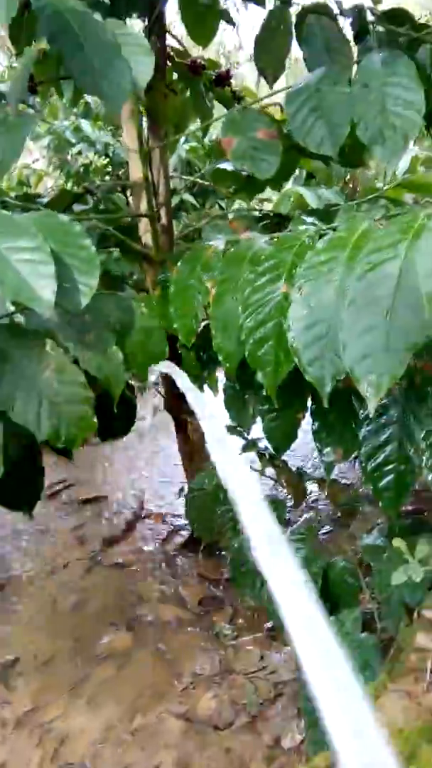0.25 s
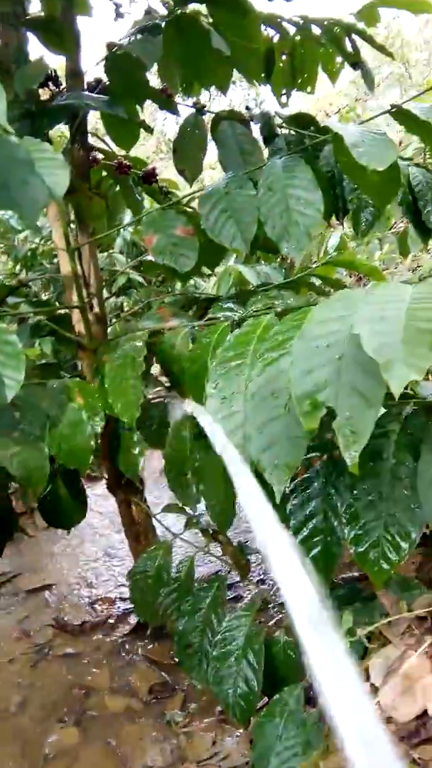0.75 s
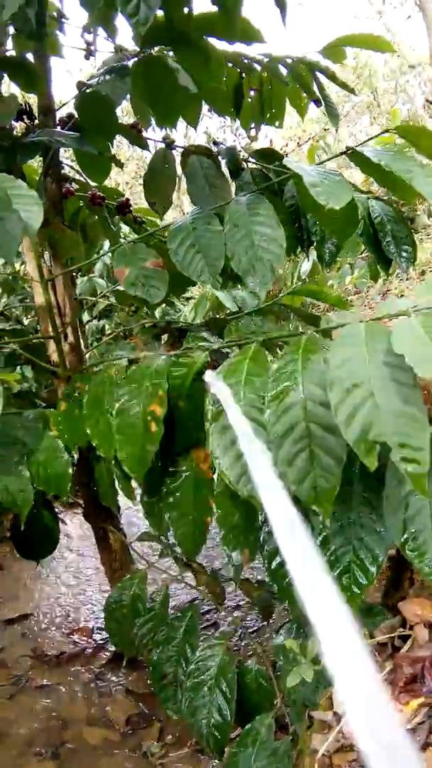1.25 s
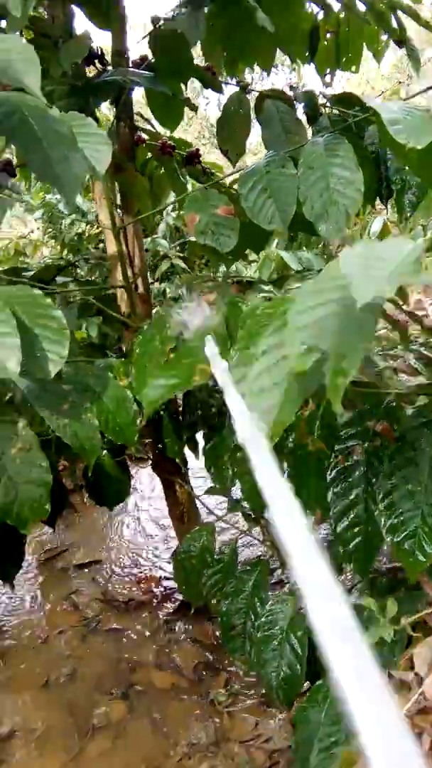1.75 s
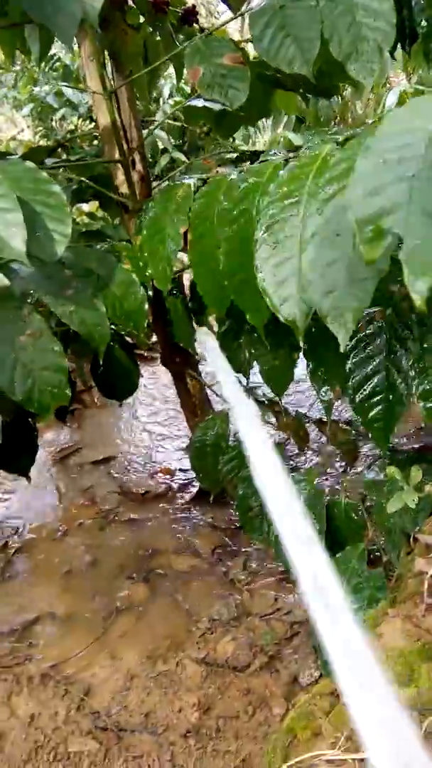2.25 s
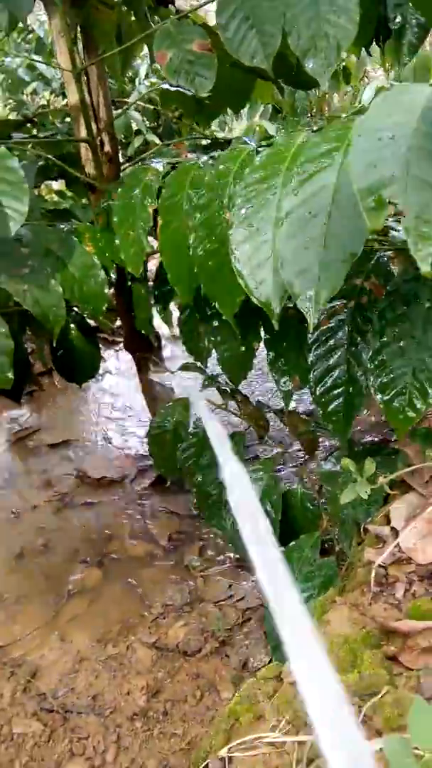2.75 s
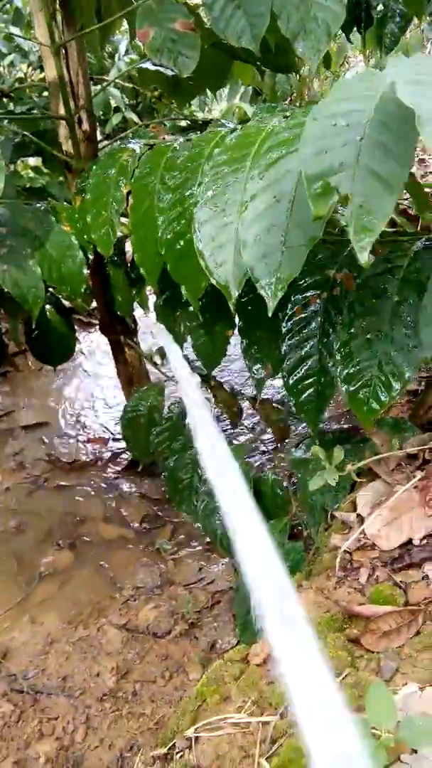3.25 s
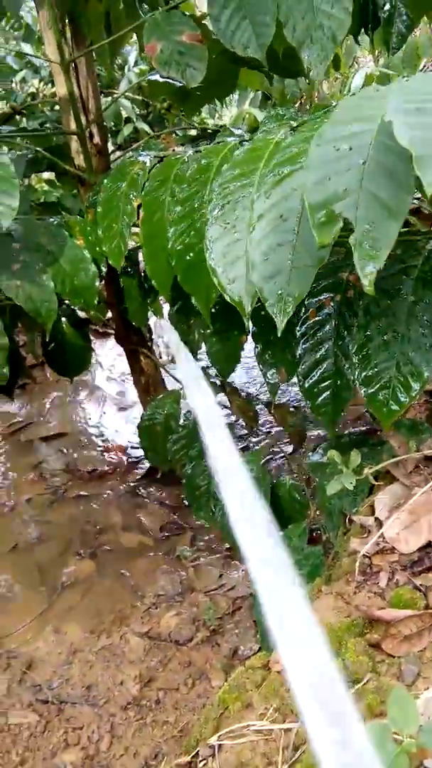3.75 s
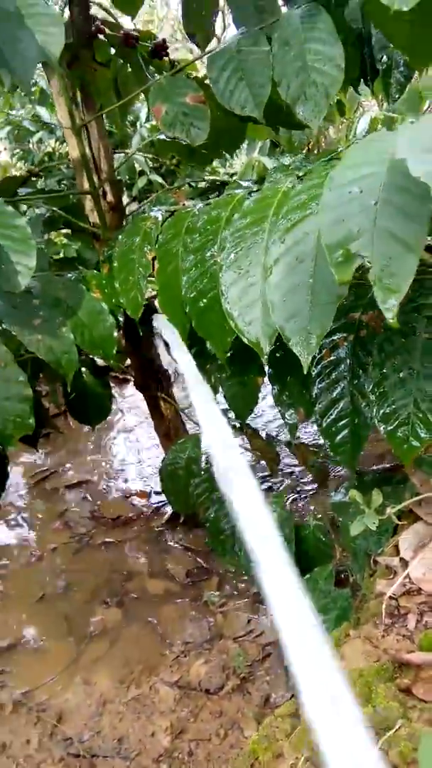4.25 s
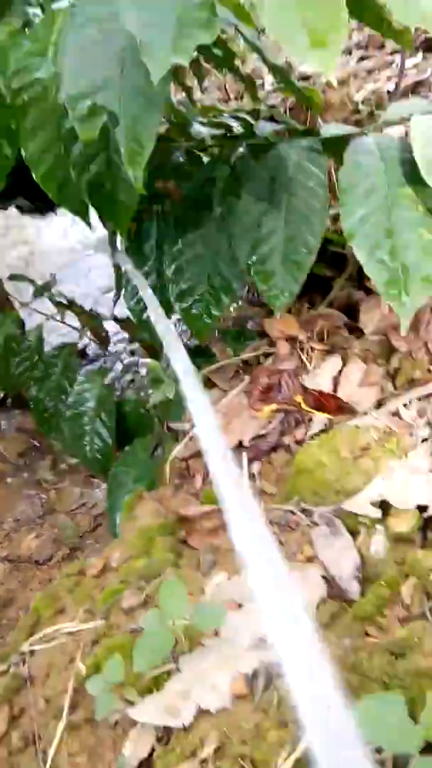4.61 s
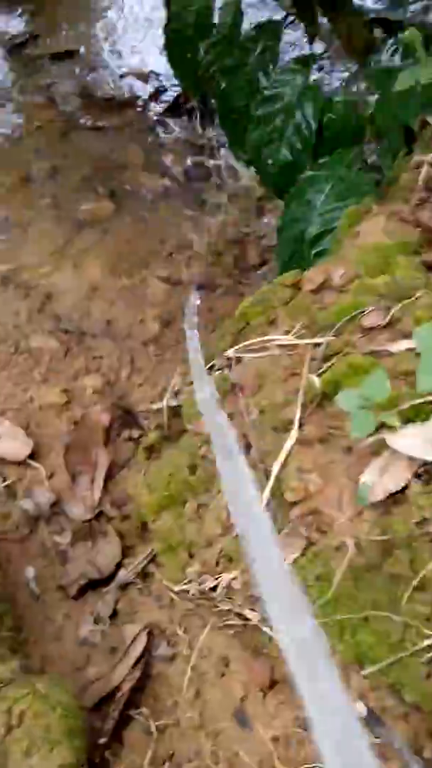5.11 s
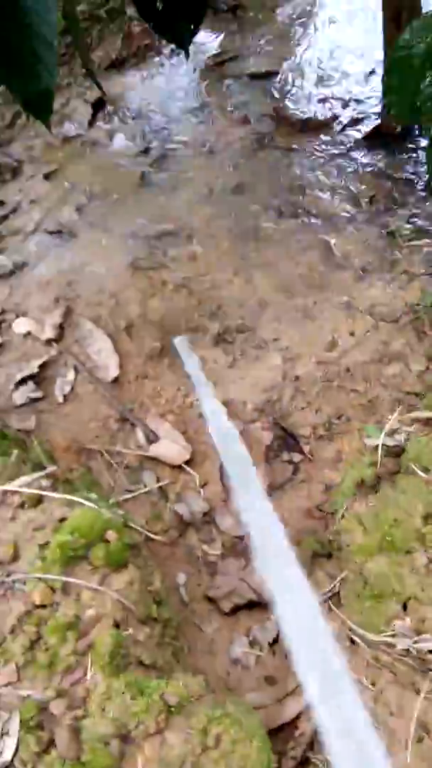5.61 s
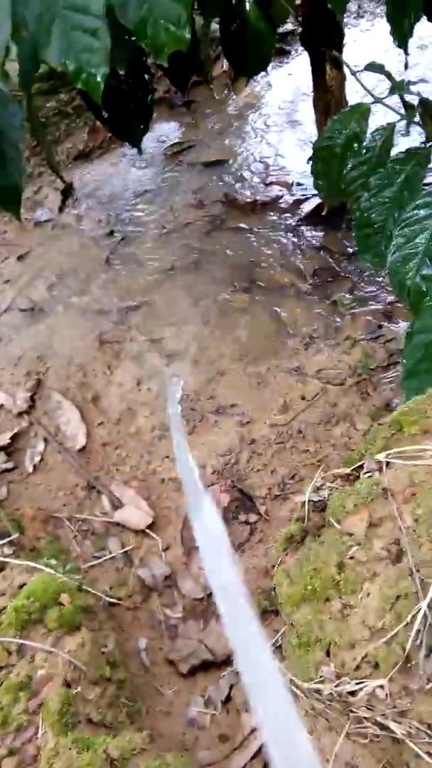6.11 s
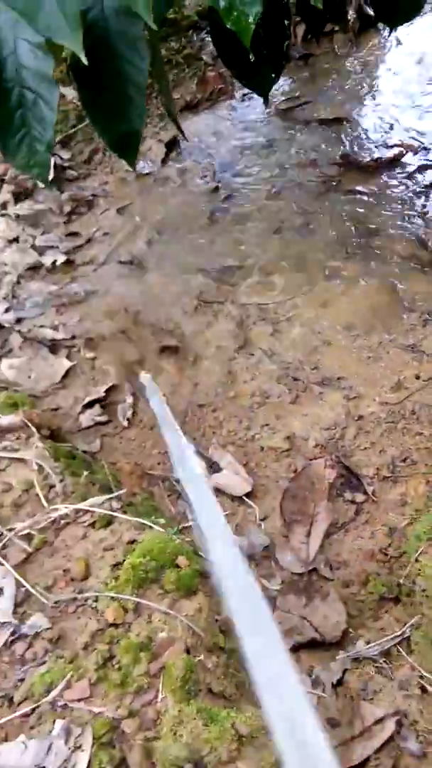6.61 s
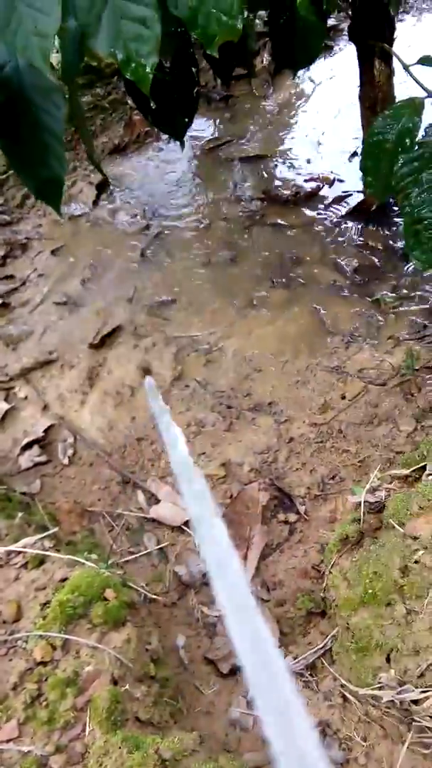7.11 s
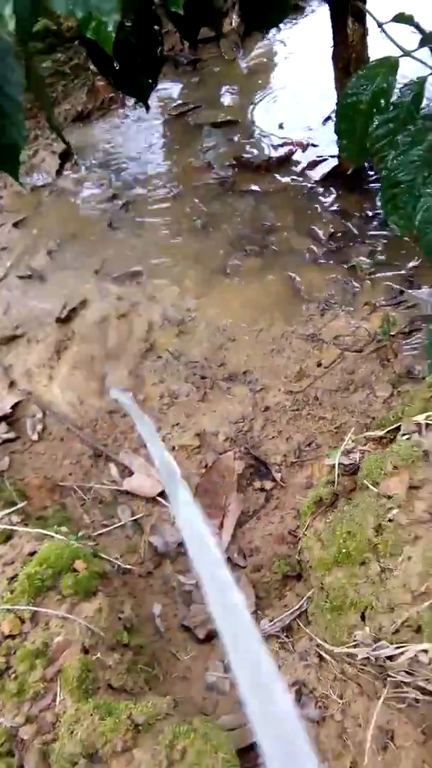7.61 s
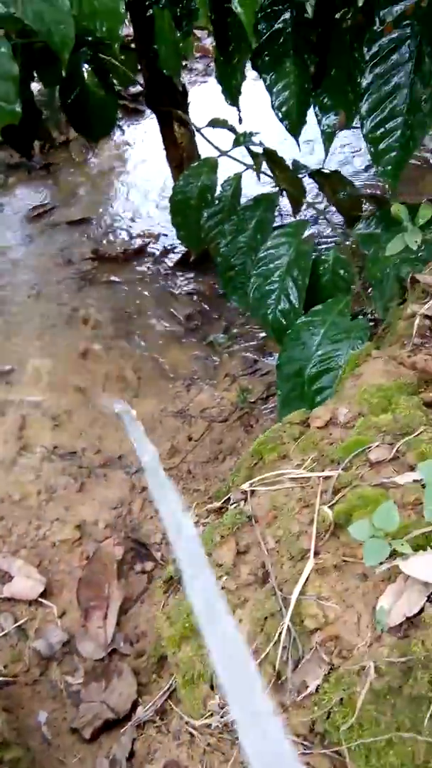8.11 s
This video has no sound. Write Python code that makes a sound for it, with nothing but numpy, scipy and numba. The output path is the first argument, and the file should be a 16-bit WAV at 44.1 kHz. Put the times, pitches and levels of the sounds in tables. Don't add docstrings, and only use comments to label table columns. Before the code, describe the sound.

Water hisses steadily from a hose, slapping foliage over a puddle, then sparkling on bare mud close by, with uneven splatters and soft bubble plops.

```python
import sys
import numpy as np
from scipy import signal
from scipy.fft import rfft, irfft, next_fast_len
from scipy.io import wavfile
from scipy.ndimage import uniform_filter1d, map_coordinates
from numba import njit

SR = 44100
rng = np.random.default_rng(int(sys.argv[2]) if len(sys.argv) > 2 else 0)


def ratio_of_db(decibels):
    return 10 ** (np.asarray(decibels, float) / 20)


def dump_mix(stems):
    frames = np.atleast_2d(stems).T
    limited = np.clip(frames, -1, 1)
    pcm = np.round(limited * 32767).astype(np.int16)
    wavfile.write(sys.argv[1], SR, pcm)


N = 368676

# (time [s], flow [dB], fineness [dB])
JET_FLOW = [(0.0, -41, -4), (0.56, -42, 2), (1.11, -44, -3.5), (1.48, -36, -3), (1.77, -37, -6),
            (1.9, -39.5, -2), (2.23, -48, 4), (2.79, -44, 6.5), (3.34, -44, -1), (3.9, -43.5, -3.5),
            (4.46, -41.5, 1), (5.02, -45, 1), (5.57, -37.5, 7), (6.13, -45, 9.5), (6.69, -39, 4),
            (7.25, -38.5, 5), (7.8, -36.5, 0.5), (8.36, -42, 9.5)]
# (time [s], change [dB], half length [s], change of fineness [dB])
JET_GUSHES = [(0.038, -7.5, 0.018, 1.5), (0.066, 4, 0.0058, -6), (0.137, -4.5, 0.02, 0),
              (0.225, 1, 0.052, 2.5), (0.29, -2.5, 0.011, 5), (0.603, 0, 0.025, 0.5), (0.68, -2, 0.05, -6),
              (1.215, -5, 0.017, 3), (1.316, -7.5, 0.069, 0.8), (1.845, -5.5, 0.019, 2),
              (1.966, -8.5, 0.046, -1.8), (2.137, 10.5, 0.014, 0.5), (2.33, 8, 0.048, 1.5),
              (2.48, 5.5, 0.084, -6.5), (2.778, 9, 0.016, -10.5), (2.931, 8.5, 0.024, -3),
              (3.074, -9, 0.0078, 8), (3.202, 7, 0.014, 1), (3.272, 5, 0.0086, -12), (3.267, -8, 0.0036, 2),
              (3.3, -11, 0.01, -1), (3.471, 5.5, 0.016, 0), (4.507, 4, 0.023, -2), (4.836, -16, 0.011, 13),
              (4.945, 6, 0.06, 0), (5.18, 5.5, 0.063, -3), (5.552, -5, 0.063, 0), (5.849, -8, 0.0075, 3),
              (5.88, -6.5, 0.0092, 5), (5.972, 11.5, 0.058, -15.5), (6.066, 3, 0.054, -5),
              (6.16, 3.5, 0.042, -8), (6.382, 3.5, 0.064, -1.5), (6.583, 6, 0.017, -4.5),
              (6.96, 4, 0.032, -7), (7.02, -3, 0.0089, -4), (7.12, 2.5, 0.015, -5), (7.3, 1.5, 0.03, -1),
              (7.577, 1.5, 0.036, -1), (7.675, 4, 0.018, -3.5), (7.8, -6.5, 0.043, 9.5),
              (7.904, -10, 0.04, 11), (7.968, -7.5, 0.015, 6)]
# (time [s], level [dB])
MISTING = [(0, -17.5), (0.35, -21.5), (0.7, -15), (1.3, -18.5), (1.7, -17), (2.4, -23), (2.85, -15),
           (3.15, -22.5), (3.7, -18), (4.2, -22), (4.6, -18), (5.5, -18.5), (6.2, -19), (6.75, -18.5),
           (7.2, -19), (7.6, -21.5), (8.36, -19)]
# (time [s], rise [dB])
NOZZLE_SPITS = [
    (0.32, 10),
    (1.19, 5),
    (1.67, 2),
    (2.27, 6),
    (3.36, 5),
    (4.15, 7),
    (6.47, 2),
    (8.29, -1),
]
# (time [s], level [dB])
SPRAY_CLOSENESS = [(0, -5), (1.3, -6), (2.5, -3), (3.3, -4), (4.5, -4.5), (5.5, -0.5), (6, 1), (6.4, 0),
                   (6.8, 0), (7.1, -4), (7.35, -3.5), (7.6, -3), (7.85, 5.5), (8.36, -3.5)]
# (time [s], change [dB], half length [s])
COARSE_MIST_DIP = (7.27, -5, 0.19)
# (time [s], gain [dB], half length [s], pitch [Hz])
HOLLOW_POCKETS = [
    (1.09, -1, 0.05, 2500),
    (1.6, -2, 0.17, 2470),
    (6.98, 4, 0.035, 2750),
    (7.69, -5, 0.025, 2910),
]
# (time [s], peak [dB], ring [Hz])
LEAF_SLAPS = [(0.1027, -25, 2920), (0.181, -25.5, 4200), (0.1947, -21, 4330), (0.2141, -22.5, 2500),
              (0.32, -21, 3650), (0.41, -18, 4130), (0.5164, -21, 4720), (0.5511, -20.5, 4090),
              (0.854, -22.5, 3860), (1.049, -29, 2500), (1.0793, -25, 2450), (1.0979, -25, 2640),
              (1.184, -20, 3130), (1.3997, -25, 2520), (1.4195, -23, 3100), (1.437, -24, 2620),
              (1.4541, -29, 2530), (1.48, -25, 2520), (1.6213, -21, 2530), (1.6763, -27, 2500),
              (1.7384, -18.5, 2880), (1.778, -20, 2650), (1.9094, -23, 2920), (2.137, -23, 4470),
              (2.1928, -24.5, 4140), (2.2366, -28, 4160), (2.2593, -29, 4170), (2.3124, -14, 4200),
              (2.347, -21, 4970), (2.362, -17.5, 2970), (2.4197, -24, 4340), (2.4784, -24, 2800),
              (2.5428, -21.5, 3600), (2.598, -23, 4200), (2.6957, -19.5, 3230), (2.7746, -15, 3030),
              (2.829, -26, 4040), (2.922, -17, 2880), (3.0044, -21, 5300), (3.088, -22.5, 4460),
              (3.093, -21, 2860), (3.155, -27, 4400), (3.1852, -13, 4250), (3.2495, -24, 2730),
              (3.2707, -23.5, 2470), (3.3262, -26, 3000), (3.346, -18, 4500), (3.438, -21.5, 4400),
              (3.816, -29, 2980), (4.33, -20.5, 2830), (4.3849, -20, 2430), (4.4283, -23.5, 3020),
              (4.44, -26, 3000), (4.488, -21, 2980), (4.5185, -20.5, 2980), (4.5305, -23, 3600),
              (4.6808, -23, 3570), (4.734, -26, 2860), (4.749, -23, 2800), (4.9377, -18, 4540)]
# (time [s], peak [dB], ring [Hz])
SOIL_SLAPS = [(5.369, -18.5, 5000), (5.3944, -20, 3860), (5.475, -23, 3370), (5.5366, -26, 5300),
              (5.6883, -16, 3640), (5.7347, -17, 5200), (5.7744, -15.5, 5300), (5.8115, -30, 5140),
              (5.824, -26, 5300), (5.89, -18, 4170), (5.9004, -18.5, 2640), (5.919, -16, 2990),
              (5.9305, -12, 6340), (5.9452, -16, 4400), (5.9498, -26, 2960), (5.964, -20, 2950),
              (5.9827, -9.5, 2900), (6.0023, -18, 2700), (6.045, -19, 3000), (6.097, -19, 4740),
              (6.3213, -23, 4730), (6.3438, -14.5, 4500), (6.377, -19.5, 4160), (6.449, -24, 4910),
              (6.5064, -27, 4970), (6.5606, -16, 5140), (6.606, -18, 4370), (6.6338, -17, 5170),
              (6.66, -19, 3750), (6.7179, -19, 4200), (6.735, -15, 2720), (6.7717, -15.5, 4980),
              (6.7987, -27, 4300), (6.8204, -14.5, 5100), (6.839, -16, 4380), (6.9376, -19, 2980),
              (7.043, -19, 4480), (7.0926, -15, 5010), (7.163, -19, 4370), (7.184, -20, 4470),
              (7.2173, -22, 4780), (7.289, -18, 4370), (7.336, -20, 4560), (7.3715, -19, 4700),
              (7.4094, -16, 4170), (7.5944, -21, 4800), (7.6333, -20, 4700), (7.67, -22, 3240),
              (7.7214, -18, 4730), (7.794, -27, 4940), (7.864, -25, 5400), (7.9758, -17.5, 4480),
              (8.009, -13.5, 5000), (8.054, -23, 5530), (8.0813, -20, 4760), (8.1215, -19, 4340),
              (8.1654, -22, 2800), (8.2854, -18, 4500), (8.327, -19, 5430), (8.3435, -13.5, 4850)]
# (time [s], peak [dB])
NEAR_DROPS = [(0.3127, -35), (1.6596, -27), (1.8721, -38), (2.3236, -40), (2.7382, -39), (2.7736, -35),
              (2.8285, -38), (2.8709, -43), (2.8858, -36), (4.9392, -41), (5.2131, -40), (5.4745, -34),
              (5.5278, -32), (5.5653, -33), (5.672, -35), (5.7074, -42), (5.7803, -34), (5.8995, -33),
              (5.9688, -41), (6.097, -39), (6.1858, -26.5), (6.2537, -36), (6.2781, -32), (6.3345, -30),
              (6.4482, -32), (6.7017, -37), (6.7451, -26), (6.8029, -32), (6.9745, -30), (7.2374, -40),
              (7.4629, -35), (7.6331, -31), (7.658, -34), (7.7209, -31), (7.8965, -39), (7.9758, -36),
              (8.1843, -36), (8.2018, -30), (8.2856, -34)]
# (time [s], churning [dB], shallowness [dB])
PUDDLE_CHURN = [(0.0, -53, 6.5), (0.56, -55.5, 6), (1.11, -48.5, 8), (1.67, -48.5, 9), (2.23, -61, 8.5),
                (2.79, -53, 6.5), (3.34, -54, 3.5), (3.9, -55, 7), (4.46, -55.5, 6), (5.02, -57, 4.5),
                (5.57, -60, 2.5), (6.13, -56.5, 7), (6.69, -67.5, 8.5), (7, -58, 5.5), (7.25, -55.5, 6),
                (7.5, -57.5, 2), (7.8, -63.5, 6), (8.36, -53, 1)]
# (time [s], change [dB], half length [s], change of shallowness [dB])
PUDDLE_GURGLES = [(0.344, -5.5, 0.05, 0), (0.865, 6, 0.023, 2), (1.272, -5.5, 0.098, -0.5),
                  (1.807, 3.5, 0.04, 4.5), (2.11, 9, 0.062, 2.5), (2.554, 7.5, 0.014, -4),
                  (2.852, -6.0, 0.055, 3), (2.92, -3, 0.027, 2), (3.059, -12, 0.053, -7),
                  (3.117, 5.5, 0.058, 8.5), (3.297, -10, 0.016, -3), (3.43, 3.5, 0.018, 7),
                  (3.335, 3, 0.012, 3), (3.622, 3.5, 0.061, -4.5), (3.757, 2.5, 0.017, -8),
                  (4.044, 5.5, 0.018, 1), (4.125, 4, 0.0084, -12), (4.17, 2.5, 0.049, 3),
                  (4.52, 1.5, 0.024, 3), (4.625, 4.5, 0.11, 5.5), (5.006, 7.5, 0.025, -4.5),
                  (5.135, -1, 0.04, -4), (5.192, 8.5, 0.018, 8), (5.273, -2, 0.029, 2),
                  (5.41, 0, 0.036, -8.5), (5.853, 1, 0.07, -10.5), (5.994, 5, 0.072, 2.5),
                  (6.292, -1.5, 0.057, -8.5), (6.587, 12, 0.035, -1), (6.746, 9.5, 0.09, -6),
                  (7.117, 7, 0.058, -1), (7.3, -1, 0.025, -5), (7.382, 1, 0.03, 4), (7.412, 8.5, 0.075, -3),
                  (7.623, 5, 0.039, 8), (7.907, 4.5, 0.06, -7.5), (8.273, -8, 0.024, -2)]
# (time [s], peak [dB], pitch [Hz])
BIG_BUBBLES = [(0.602, -29, 1340), (0.872, -23, 1240), (0.617, -30, 970), (1.185, -21, 2300),
               (1.3, -34, 800), (1.602, -30, 1530), (1.766, -21.5, 1570), (1.818, -24.5, 1080),
               (2.05, -27, 1520), (2.145, -33.5, 537), (2.513, -28.5, 480), (2.55, -31, 510),
               (2.557, -30, 1300), (2.774, -18, 1370), (2.776, -13, 2120), (2.791, -22, 2900),
               (3.104, -29, 1700), (3.14, -29, 990), (3.272, -24, 2000), (3.327, -27, 1500),
               (3.434, -29, 220), (3.462, -33, 340), (3.53, -33, 400), (3.568, -30, 506), (3.57, -35, 230),
               (3.607, -36, 260), (3.692, -30, 450), (3.817, -33, 423), (3.9, -32.5, 300),
               (3.922, -37, 530), (4.015, -29, 340), (4.035, -27, 420), (4.052, -27, 537),
               (3.629, -27.5, 1050), (3.755, -28.5, 460), (3.96, -27, 1410), (3.992, -30, 211),
               (4.049, -27, 1210), (4.075, -20, 1290), (4.121, -22, 510), (4.25, -29, 576),
               (4.269, -23.5, 1210), (4.296, -33, 1330), (4.335, -30, 574), (4.53, -15, 1380),
               (4.562, -28, 1370), (4.582, -22, 1170), (4.633, -27, 1340), (4.68, -17, 1470),
               (4.485, -24, 1560), (5.185, -27, 1410), (7.033, -26.5, 1290), (7.113, -34, 1250),
               (7.286, -32, 1010), (7.638, -28, 1230), (7.33, -31, 398), (7.38, -27.5, 1030),
               (7.41, -25, 1190), (7.446, -29, 705)]
# (time [s], peak [dB], pitch [Hz])
FINGER_SLIPS = [(0.059, -30, 1200), (0.178, -30, 1050), (0.261, -32.5, 1210), (0.293, -32, 1100),
                (0.395, -35, 937), (2.262, -33, 1200), (2.756, -33, 800), (5.536, -36, 1100),
                (6.847, -30, 1540), (7.962, -31, 1150), (8.075, -32, 1160), (8.343, -38, 1080)]
# (frequency [Hz], density [dB per Hz])
DEEP_COLOUR = [(13, -61), (22, -38), (48, -37), (70, -29.5), (190, -14), (398, -14.5), (449, -13),
               (754, -17.5), (939, -9.5), (1100, -9.5), (1290, -6), (1710, -11), (2170, 1), (2600, 12),
               (3380, -15), (5720, -120)]
# (frequency [Hz], density [dB per Hz])
BRIGHT_COLOUR = [(820, -41), (1400, -46), (1710, -18), (2180, -13.5), (2390, -4), (2720, 0.5), (3830, -3.5),
                 (4500, 2.5), (6380, -8), (6700, -15), (7200, -22), (8650, -33), (9900, -32.5),
                 (10900, -30.5), (11350, -30.5), (11800, -27), (13000, -27), (15500, -43)]
LAYER_EDGES_HZ = (170, 780, 1850, 3600, 7500)
# (frequency [Hz], share of depth [1])
LEAF_SCATTER = [(300, 0.44), (2000, 1.6), (6000, 2.3), (12000, 0.89)]
# (start [s], end [s], first delay [ms], last delay [ms], gain [1])
NEARBY_ECHOES = [(-1.5, 0.94, 0.59, 0.8, 0.17), (2.5, 3.45, 0.96, 0.9, 0.16), (3.5, 4.5, 1.13, 1.18, -0.15),
                 (5, 6.7, 0.53, 0.476, 0.025), (6.5, 8.3, 0.653, 0.668, -0.016),
                 (6.5, 6.8, 1.09, 0.97, 0.11), (7.5, 7.25, 1.37, 1.28, -0.17), (7, 7.25, 0.73, 0.74, 0.2),
                 (6, 7.25, 1.13, 1.175, 0.17), (8.5, 8.9, 1.508, 1.57, -0.11), (5, 7.9, 0.53, 0.53, -0.22),
                 (7.15, 7.6, 1.25, 1.2, 0.13), (8, 8.7, 1.03, 1.088, 0.15)]
# (start [s], end [s], first delay [ms], last delay [ms], gain [1])
BANK_ECHOES = [
    (1.9, 5.7, 0.7, 0.73, 0.23),
    (2.5, 5.5, 0.21, 0.31, 0.1),
    (2.7, 4.7, 1.1, 1.08, -0.15),
]


def jet(strikes, surge):
    patter_db, fizz_db = coarse_and_fine(JET_FLOW, JET_GUSHES)
    spits_db = sum(db * bell(s, half_s=0.015) for s, db in NOZZLE_SPITS)
    mist_db = course(MISTING)[0] + fizz_db + 0.29 * (fizz_db - patter_db) + spits_db
    low, middle, high = LAYER_EDGES_HZ[-3:]

    coarse_drops = drops(count=9000, lo_hz=1626, hi_hz=3870, cycles=3.5, spread_db=7.5)
    patter = 0.32 * coarse_drops + 1.29 * strikes + 1.25 * wash()
    fine_drops = drops(count=14000, lo_hz=3225, hi_hz=8110, cycles=5.7, spread_db=1.5)
    fizz = 0.44 * fine_drops + 0.73 * strikes + 0.77 * wash()
    mist = 0.51 * strikes + 0.8 * wash()

    near_db, = course(SPRAY_CLOSENESS)
    thud = ratio_of_db(-9.5 - 1.06 * near_db) * coloured(patter, BRIGHT_COLOUR, low, 2305)
    patter = coloured(patter, BRIGHT_COLOUR, 2330, middle) + thud
    sparkle = ratio_of_db(-1.0 + 0.45 * near_db) * coloured(fizz, BRIGHT_COLOUR, 4690, high)
    fizz = coloured(fizz, BRIGHT_COLOUR, middle, 4685) + sparkle
    dip_s, dip_db, dip_half_s = COARSE_MIST_DIP
    coarse_mist_db = 3.0 - 0.34 * near_db + dip_db * bell(dip_s, dip_half_s) + 1.2 * wobble(30)
    coarse_mist = ratio_of_db(coarse_mist_db) * coloured(mist, BRIGHT_COLOUR, high, 11640)
    mist = coarse_mist + ratio_of_db(0.57 * near_db) * coloured(mist, BRIGHT_COLOUR, 11351, SR)

    patter = unit(patter * ratio_of_db(0.93 * surge + 0.55 * wobble(22)))
    fizz = unit(fizz * ratio_of_db(0.79 * surge + 0.08 * wobble(19)))
    mist = unit(mist * ratio_of_db(0.92 * surge))
    return ratio_of_db(patter_db + 0.5) * patter + ratio_of_db(fizz_db + 1.0) * fizz + ratio_of_db(mist_db + 5.5) * mist


def breakup():
    lumps = bursts(count=900, fade_s=0.0037, spread_db=7.5)
    surge = 1.9 * wobble(14) + 2.08 * np.log(0.37 + lumps)
    return surge - uniform_filter1d(surge, size=6000)


def bursts(count, fade_s, spread_db):
    lumps = np.abs(impacts(count, spread_db))
    fading = signal.lfilter([1], [1, -np.exp(-1 / (fade_s * SR))], lumps)
    return fading / fading.mean()


def lulls():
    lull_db, lull_s = -3.5, 0.011
    dip, t = np.zeros(N + SR), np.arange(SR // 20) / SR
    for s, *_ in LEAF_SLAPS:
        dip[N - round(s * SR):][:len(t)] += np.exp(-t / lull_s)
    return ratio_of_db(lull_db * np.minimum(dip[N:0:-1], 1))


def hollows(x):
    out, width_hz = x.copy(), 210
    for s, db, half_s, hz in HOLLOW_POCKETS:
        ringing = signal.lfilter(*signal.iirpeak(hz, hz / width_hz, SR), x)
        out += ratio_of_db(db) * bell(s, half_s) * ringing
    return out


def slaps():
    burst, t = np.zeros(N + SR), np.arange(SR // 8) / SR
    s, db, hz = np.transpose(LEAF_SLAPS + SOIL_SLAPS)
    tail, crack = ratio_of_db(-60 * t / 0.048), 1.7 * ratio_of_db(-60 * t / 0.0037)
    splash = (tail + crack) * (1 - np.exp(-t / 0.0007))
    for start, level in zip(s, db):
        burst[round(start * SR):][:len(t)] += ratio_of_db(level - 14) * splash
    spray = coloured(wash(), BRIGHT_COLOUR, 480, SR)
    mud_db = -3 * (s >= SOIL_SLAPS[0][0])
    bubbles = rings(s, hz, ratio_of_db(db - 3.5 + mud_db), life_s=7.3 / hz, rise_s=0.00014, climb=0.0036)
    return burst[:N] * spray + bubbles


def ticks():
    burst, t = np.zeros(N + SR), np.arange(SR // 40) / SR
    for s, db in NEAR_DROPS:
        burst[round(s * SR):][:len(t)] += ratio_of_db(db - 9 - 60 * t / 0.015) * (1 - np.exp(-t / 0.0002))
    return burst[:N] * coloured(wash(), BRIGHT_COLOUR, 11200, 14300)


def gulps():
    s, db, hz = np.transpose(BIG_BUBBLES)
    t60_s = 0.028
    life_s = t60_s / np.log(1000) * np.sqrt(400 / hz)
    ring = rings(s, hz, ratio_of_db(db - 5.0), life_s, rise_s=0.32 * life_s, climb=0.013)
    return signal.sosfilt(signal.butter(2, 150, "high", fs=SR, output="sos"), ring)


def creaks():
    out, t = np.zeros(N + SR), np.arange(-150, 150) / SR
    drag_s, first_gap_s, slowing_s, scatter_s = 2.884, 0.0063, 0.00047, 0.0004
    slips, drag_db, arch_db, drag_hz = 9, -27.5, 6, 980
    drag = []
    for k in range(slips):
        s = drag_s + k * (first_gap_s + slowing_s * k) + rng.normal(0, scatter_s)
        db = drag_db - arch_db * (2 * (k + 0.5) / slips - 1) ** 2
        drag.append((s, db, drag_hz * rng.normal(1, 0.044)))
    for s, db, hz in FINGER_SLIPS + drag:
        swing = -np.cos(2 * np.pi * hz * t) + 0.42 * np.sin(2 * np.pi * 2.0 * hz * t)
        jolt = swing * np.exp(-(t / 0.00064) ** 2)
        out[round((s - 0.0018) * SR):][:len(t)] += ratio_of_db(db + 0.5) * jolt
    return out[:N]


def puddle(strikes, surge):
    burble_db, babble_db = coarse_and_fine(PUDDLE_CHURN, PUDDLE_GURGLES)
    bottom, low, middle = LAYER_EDGES_HZ[:3]
    churn = 1.34 * wobble(16) + 0.86 * wobble(45)
    large = drops(count=900, lo_hz=190.4, hi_hz=700, cycles=2.45, spread_db=3)
    burble = coloured(0.92 * large + 2.3 * wash(), DEEP_COLOUR, bottom, low)
    burble = unit(burble * ratio_of_db(0.91 * churn + 0.52 * wobble(49)))
    middling = drops(count=5000, lo_hz=680, hi_hz=1886, cycles=1.66, spread_db=2.0)
    babble = coloured(0.54 * middling + 0.56 * strikes + 1.24 * wash(), DEEP_COLOUR, low, middle)
    babble = unit(babble * ratio_of_db(0.83 * churn + 0.88 * surge))
    rumble_db = -67.0 + 0.59 * wobble(3.23) + 0.62 * churn + 0.47 * (burble_db - burble_db.mean())
    rumble = coloured(wash(), DEEP_COLOUR, 0.63, bottom) * ratio_of_db(rumble_db)
    return ratio_of_db(burble_db + 0.6) * burble + ratio_of_db(babble_db + 0.3) * babble + rumble


def drops(count, lo_hz, hi_hz, cycles, spread_db):
    when, pitch, size, life = rng.random((count, 4)).T
    hz = lo_hz * (hi_hz / lo_hz) ** pitch
    life_s = cycles * (0.32 + 1.24 * life) / hz
    start_s = when * (N - 1) / SR
    return unit(rings(start_s, hz, sizes(size, spread_db, 10.8), life_s, rise_s=0.11 * life_s, climb=0.028))


def impacts(count, spread_db):
    when, size, sign = rng.random((count, 3)).T
    clicks = sizes(size, spread_db, 22.6) * np.sign(sign - 0.5)
    return unit(np.bincount((when * N).astype(int), clicks, N))


def wash():
    return rng.standard_normal(N)


def sizes(chance, spread_db, most_db):
    return ratio_of_db(np.minimum(-spread_db * np.log(1 - chance), most_db))


def rings(s, hz, size, life_s, rise_s, climb):
    out, ones = np.zeros(N), np.ones(len(s))
    start = (np.asarray(s) * SR).astype(np.int64)
    add(out, start, hz / SR, size, life_s * SR * ones, rise_s * SR * ones, climb)
    return out


@njit
def add(out, start, hz, size, life, rise, climb):
    for g in range(len(start)):
        for i in range(min(int(4 * life[g]), len(out) - start[g])):
            swing = np.sin(2 * np.pi * hz[g] * i * (1 + climb * i / life[g]))
            out[start[g] + i] += size[g] * swing * np.exp(-i / life[g]) * (1 - np.exp(-i / rise[g]))


def coloured(x, spectrum, lo_hz, hi_hz):
    m, hz = next_fast_len(N + SR // 4), np.fft.rfftfreq(4096, 1 / SR)
    band = np.sqrt(above(hz, lo_hz) * (1 - above(hz, hi_hz)))
    cepstrum = irfft(np.log(ratio_of_db(along(spectrum, hz)) * band + 1e-6))
    cepstrum *= np.r_[1, 2 * np.ones(len(hz) - 2), 1, np.zeros(len(hz) - 2)]
    response = irfft(np.exp(rfft(cepstrum)))
    z = rfft(x, m)
    own_power = uniform_filter1d(np.abs(z) ** 2, size=2500)
    return unit(irfft(z / np.sqrt(own_power) * rfft(response, m), m)[:N])


def above(hz, edge_hz):
    return 1 / (1 + (edge_hz / (hz + 1)) ** 16)


def along(points, hz):
    f, v = np.transpose(points)
    return np.interp(np.log(hz + 1), np.log(f + 1), v)


def unit(x):
    return x / np.sqrt(np.mean(x ** 2) + 1e-20)


def wobble(rate):
    knots = rng.standard_normal(int(N * rate / SR) + 4)
    return map_coordinates(knots, [np.arange(N) * rate / SR])


def course(rows):
    s, *columns = np.transpose(rows)
    return [np.interp(np.arange(N) / SR, s, c) for c in columns]


def coarse_and_fine(slow, events):
    level_db, lean_db = course(slow)
    for s, change_db, half_s, shift_db in events:
        bump = bell(s, half_s)
        level_db, lean_db = level_db + change_db * bump, lean_db + shift_db * bump
    return level_db - lean_db / 2, level_db + lean_db / 2


def bell(s, half_s):
    rise_share = 0.97
    since = np.arange(0, N + 64, 64) / SR - s
    width = half_s * np.where(since < 0, rise_share, 2 - rise_share)
    return np.repeat(np.exp(-0.5 * (since / width) ** 2), 64)[:N]


def foliage(x, depth_db):
    hz, _, z = signal.stft(x, SR, nperseg=1024)
    field = uniform_filter1d(rng.standard_normal(z.shape), size=2, axis=0)
    field = uniform_filter1d(field, size=14, axis=1)
    gain = ratio_of_db(depth_db * along(LEAF_SCATTER, hz)[:, None] * unit(field))
    gain = gain / np.sqrt(np.mean(gain ** 2, axis=1, keepdims=True))
    return signal.istft(z * gain, nperseg=1024)[1][:N]


def echoes(x, surfaces):
    out, n = x.copy(), np.arange(N)
    for start, end, first_ms, last_ms, gain in surfaces:
        part = n[max(round(start * SR), 0):round(end * SR)]
        u = (part / SR - start) / (end - start)
        late = part - np.interp(u, [0, 1], [first_ms, last_ms]) * SR / 1000
        swell = np.sqrt(np.abs(np.sin(np.pi * u)))
        out[part] += gain * swell * np.interp(late, n, x)
    return out


def scene():
    strikes, surge = impacts(count=9000, spread_db=7), breakup()
    landing = hollows(lulls() * jet(strikes, surge))
    water = landing + echoes(puddle(strikes, surge), BANK_ECHOES)
    water = foliage(water, depth_db=1.7) + slaps() + gulps() + ticks()
    return (echoes(water, NEARBY_ECHOES) + creaks())[None]


def low_pass(x):
    return signal.sosfilt(signal.butter(12, 15740, fs=SR, output="sos"), x)


def record(dry):
    m, top_hz = next_fast_len(N), 15500
    passed = np.fft.rfftfreq(m, 1 / SR) < top_hz
    mix = irfft(rfft(dry, m) * passed, m)[:, :N]
    return low_pass(mix)


dry = scene()
out = record(dry)
dump_mix(out)
```